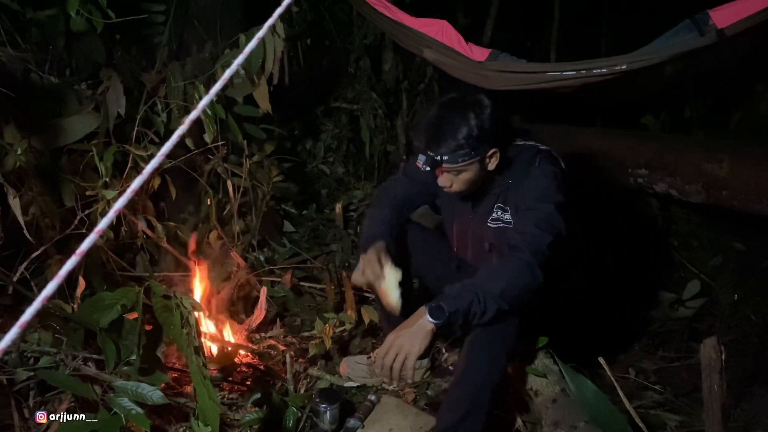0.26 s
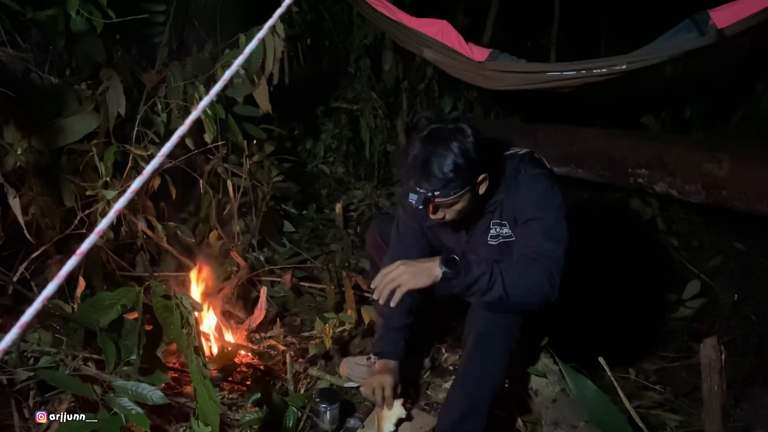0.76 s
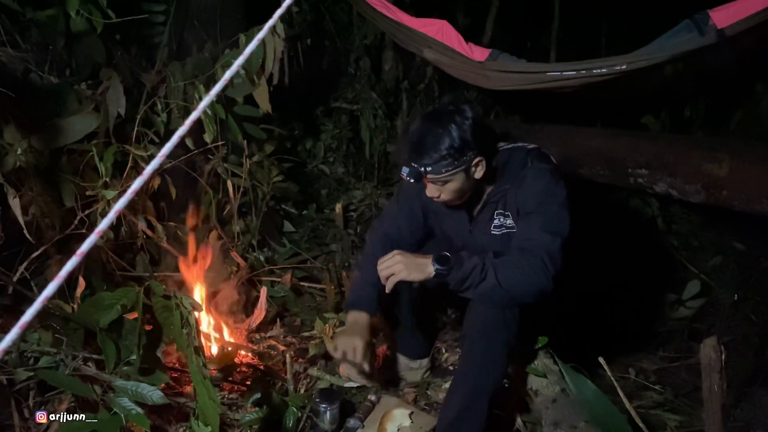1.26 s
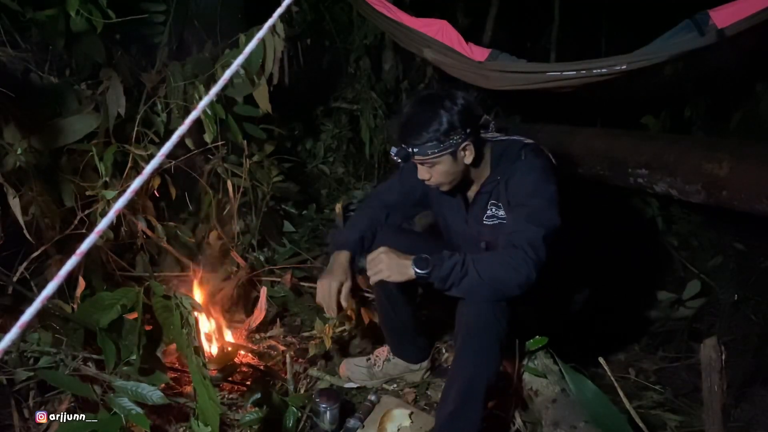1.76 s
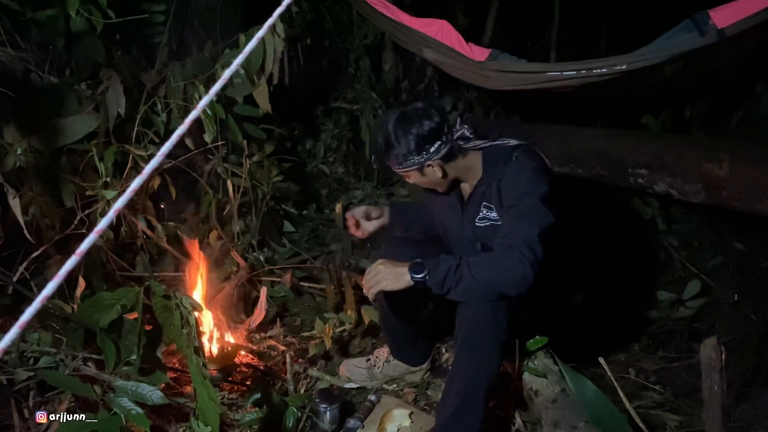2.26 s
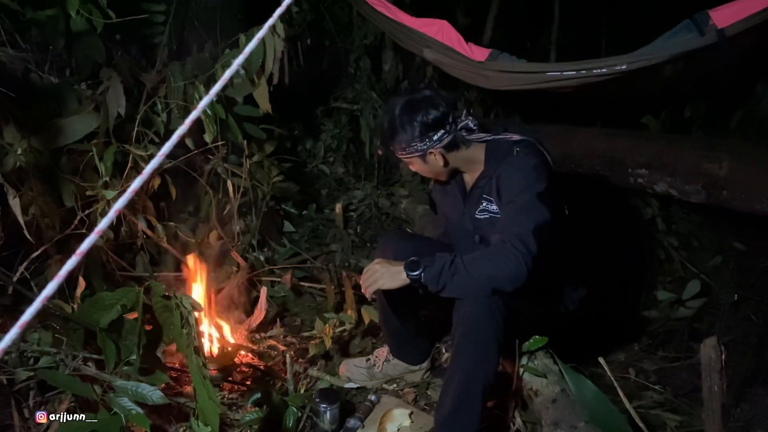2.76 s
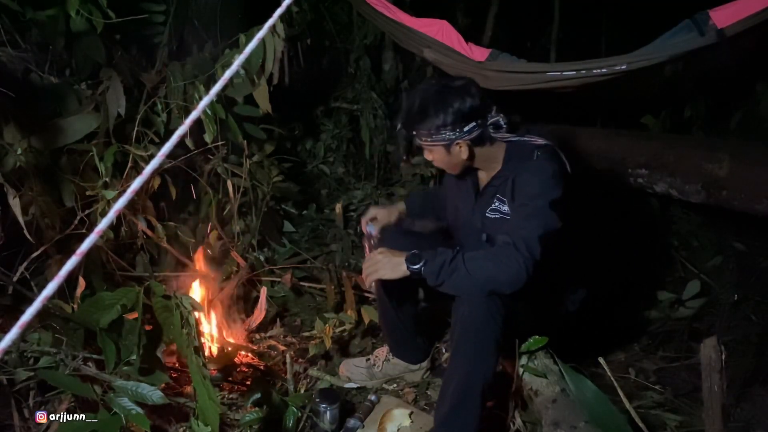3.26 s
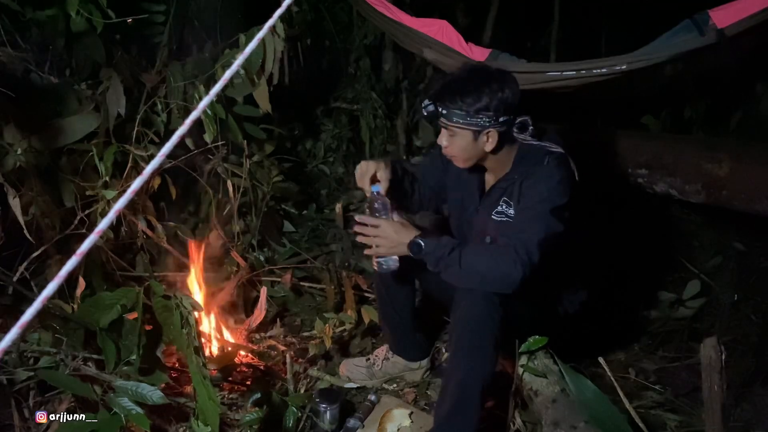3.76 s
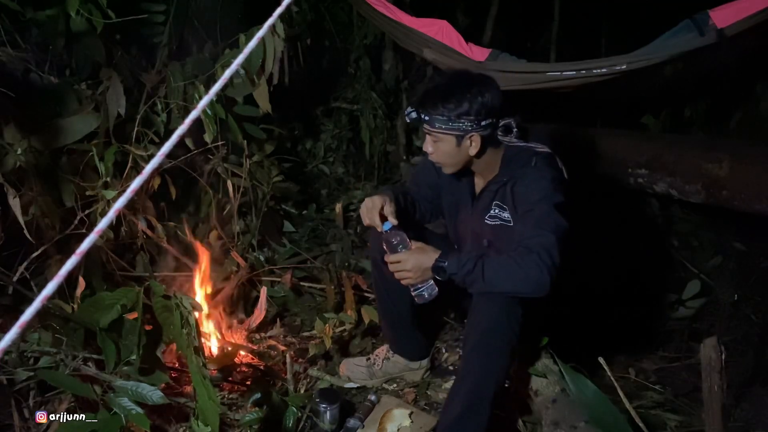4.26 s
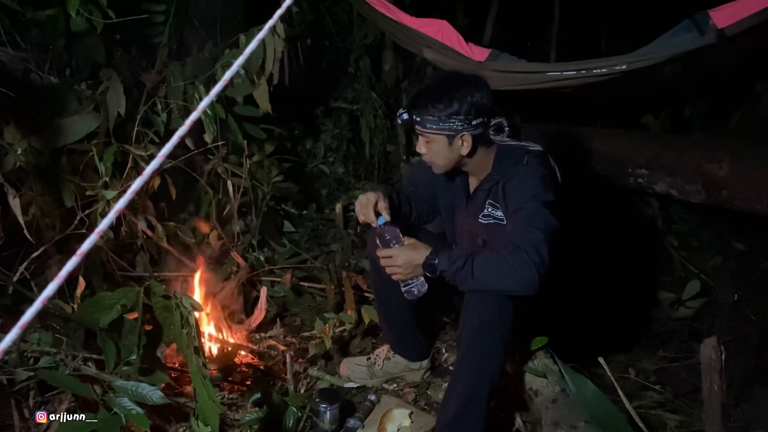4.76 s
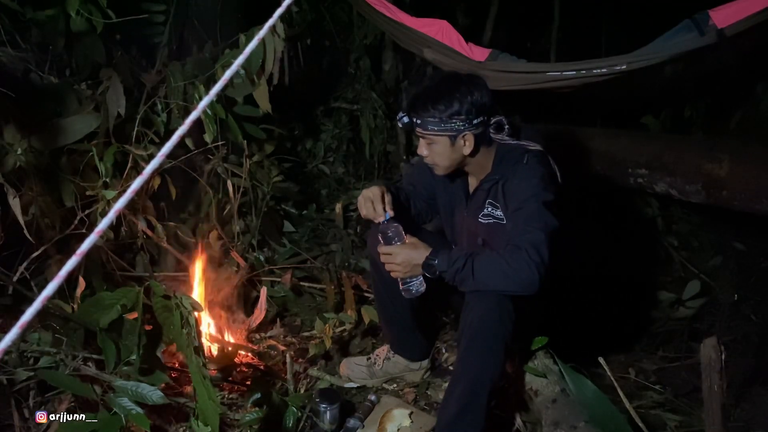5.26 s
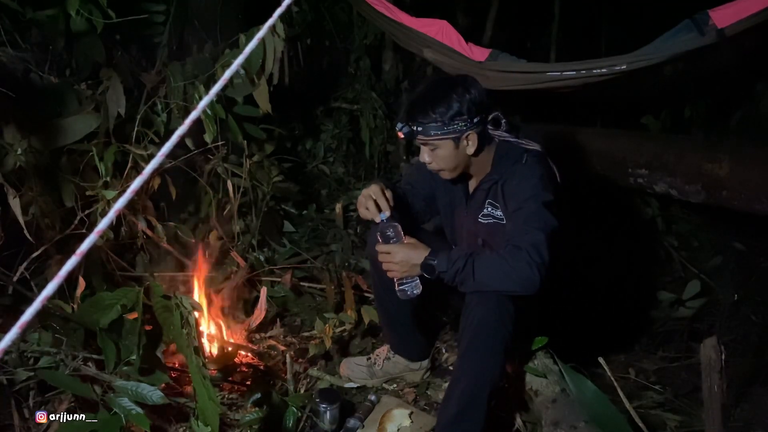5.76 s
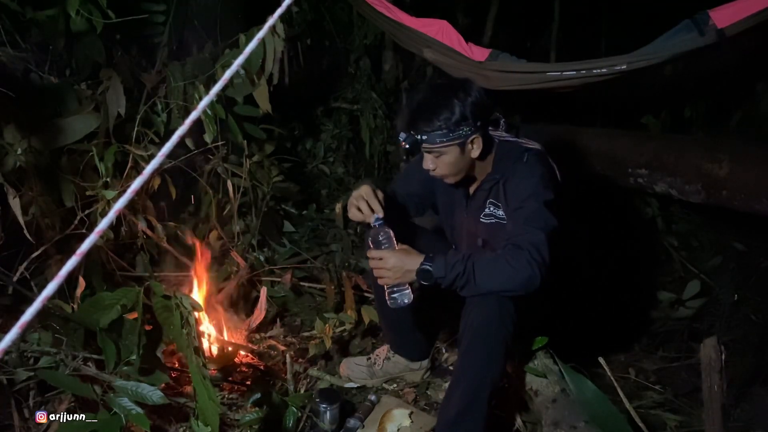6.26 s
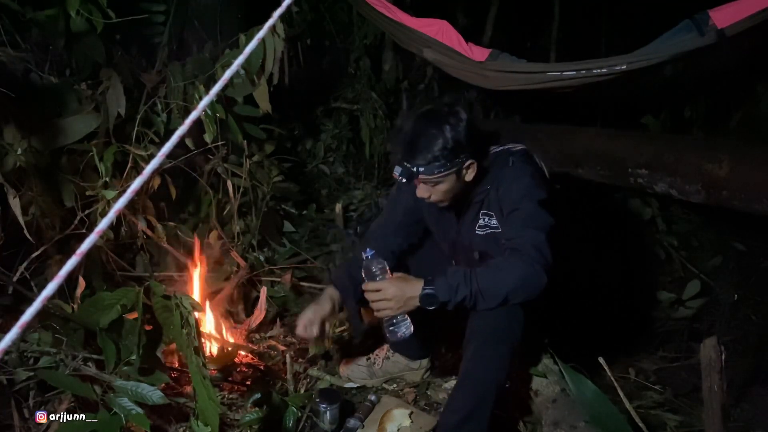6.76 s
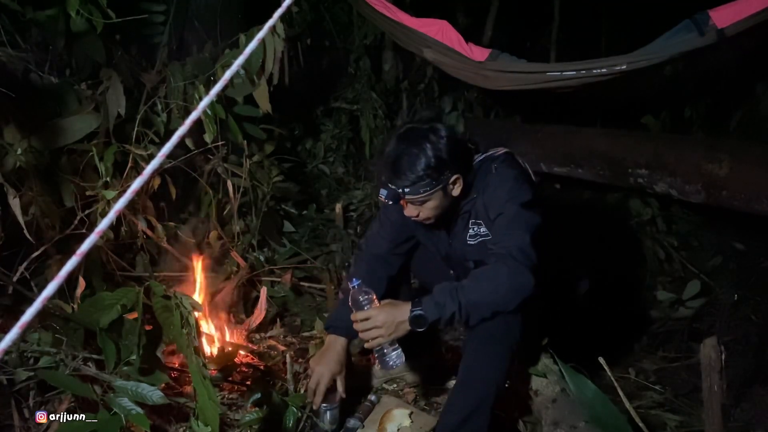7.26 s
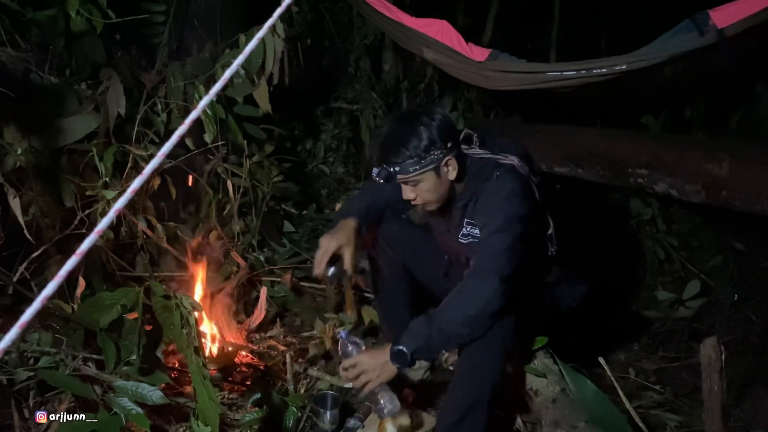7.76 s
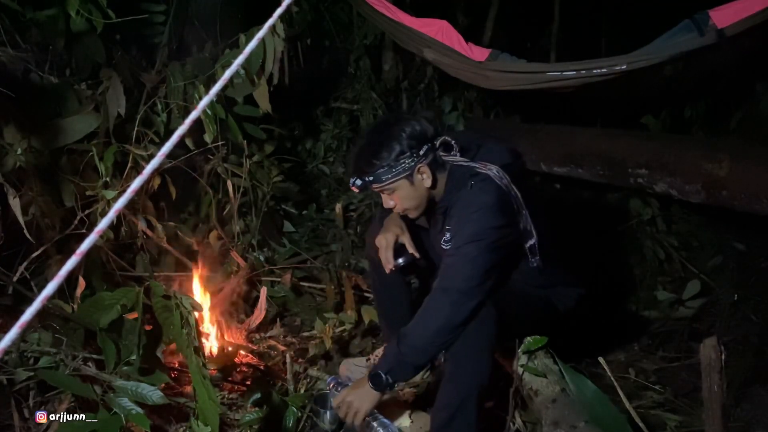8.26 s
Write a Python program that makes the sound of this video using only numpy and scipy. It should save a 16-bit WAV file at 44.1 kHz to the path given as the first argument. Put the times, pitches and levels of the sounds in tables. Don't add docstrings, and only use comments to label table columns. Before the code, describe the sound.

A tropical forest at night, heard in wide, airy stereo: continuous shrill cricket trilling, a fine treble hiss of katydids with regular ticks and random peeps. A small fire only flutters low underneath, with two sharp snaps in the first three seconds. Soft clothing movement and light taps come early, pause mid-way while a lower cricket pulses, then return around six to eight seconds, closing with a dull hollow bottle knock.

```python
import sys
import numpy as np
from scipy import signal
from scipy.fft import rfft, irfft, next_fast_len
from scipy.io import wavfile
from scipy.ndimage import uniform_filter1d

SR = 44100
rng = np.random.default_rng(int(sys.argv[2]) if len(sys.argv) > 2 else 0)


def to_wav(sig):
    pcm = np.clip(np.atleast_2d(sig), -1, 1) * 32767
    pcm = np.round(pcm).astype(np.int16)
    wavfile.write(sys.argv[1], SR, pcm.T)


def volts(x):
    e = np.asarray(x, float) / 20
    return 10 ** e


N = 375291

# [t/s, level/dB]
KATYDID_EFFORT = [(0.0, -61.5), (.9, -61), (2.5, -61), (5.0, -59.5), (6.5, -58), (7.1, -58), (7.5, -55.5),
                  (8.1, -57.5), (8.51, -59)]


def rms_one(x):
    return x / np.sqrt(np.mean(x ** 2) + 1e-20)


def in_time(rows):
    s, *columns = np.transpose(rows)
    return [np.interp(np.arange(N) / SR, s, c) for c in columns]


def at_hz(points, hz):
    points_hz, points_db = np.transpose(points)
    return np.interp(np.log(hz), np.log(points_hz), points_db, -80, -80)


def pan(db):
    return volts(np.array([[db / 2], [-db / 2]]))


def drift(rate_hz):
    r = np.exp(-80 * np.pi * rate_hz / SR)
    slow = signal.lfilter([1], [1, -2 * r, r * r], rng.standard_normal(N // 40 + 2002))[2000:]
    return np.interp(np.arange(N) / 40, np.arange(len(slow)), rms_one(slow))


def ring(s, db, hz, t60_s, rise_s=0.0015):
    out, at = np.zeros(N), round(s * SR)
    t = np.arange(min(N - at, SR // 4)) / SR
    envelope = volts(db - 60 * t / t60_s) * (1 - np.exp(-t / rise_s))
    out[at:at + len(t)] = envelope * np.sin(2 * np.pi * hz * t)
    return out


def coloured(white, spectrum):
    # [f/Hz, 0-1]
    likeness = [(30, 0.94), (120, 0.89), (300, 0.72), (600, 0.18), (1200, 0.48), (2500, 0.47), (5000, 0.37),
                (6800, 0.7), (9000, 0.9), (16000, 1)]
    size = next_fast_len(N)
    hz = np.arange(1, size // 2 + 2) * SR / size
    alike = np.clip(np.interp(hz, *np.transpose(likeness)), 0, 1)
    mid, side = rfft(white, size) * volts(at_hz(spectrum, hz))
    mid, side = irfft([np.sqrt(1 + alike) * mid, np.sqrt(1 - alike) * side], size)[:, :N]
    return (mid + side * [[1], [-1]]) / np.std(mid)


def grains(per_s, spread_db):
    sizes = volts(spread_db * np.minimum(rng.exponential(1, (2, N)), 5)) * rng.choice([-1, 1], (2, N))
    return sizes * (rng.random((2, N)) < per_s / SR)


def plateaus(rows, rise_db_s, fall_db_s, start_db=0, build_s=1):
    t = np.arange(0, N + 64, 64) / SR
    power = 0
    for start, end, db in rows:
        before, after = np.maximum(start - t, 0), np.maximum(t - end, 0)
        build_db = start_db * np.exp(-np.maximum(t - start, 0) / build_s)
        power = power + volts(2 * (db - rise_db_s * before - fall_db_s * after - build_db))
    return np.interp(np.arange(N) / SR, t, np.sqrt(power))


def riding(x, gain):
    slow = uniform_filter1d(x.mean(axis=0) ** 2, size=SR // 6)
    return x / np.sqrt(slow + slow.max() / 300) * gain


def fire_and_air():
    # [t/s, level over the steady fire/dB, width/s]
    flares = [(.5, 3, 0.23), (.96, 0, 0.025), (1.16, 6, 0.036), (1.37, 5, 0.026), (1.58, 4, 0.073),
              (2.3, 5, 0.03), (2.9, 1.5, 0.13), (3.43, 6.5, 0.017), (4.1, 4, 0.05), (4.6, 4, 0.048),
              (5.12, 3, 0.039), (6.26, 3.5, 0.067), (7.15, 0, 0.065), (7.31, 5, 0.062), (7.56, 4, 0.1)]
    # [f/Hz, density/dB]
    roar_spectrum = [(20, -12), (32, -16.5), (45, 0), (70, 2.5), (166, -4.5), (218, -8), (419, -8),
                     (634, -19), (900, -27.5)]
    # [f/Hz, density/dB]
    night_spectrum = [(300, -6.5), (600, -11), (1200, -16), (2050, -18), (2600, 0), (3200, -13),
                      (3750, -6.5), (4250, -2), (4900, -5), (5300, 4), (5620, 21.5), (5870, 4), (6150, -11)]
    start_db, end_db, night_db = -67.5, -70.5, -56.5
    t = np.arange(0, N + 64, 64) / SR
    lumps_db = sum(db * np.exp(-((t - s) / width_s) ** 2) for s, db, width_s in flares)
    fire_db = np.linspace(start_db, end_db, N) + np.interp(np.arange(N) / SR, t, lumps_db)
    flutter = rng.standard_normal((2, N)) * volts(2.65 * drift(10.9))
    roar = coloured(flutter, roar_spectrum) * volts(fire_db) * pan(1.7)
    return roar + volts(night_db) * coloured(rng.standard_normal((2, N)), night_spectrum) * pan(1.6)


def katydids():
    # [f/Hz, density/dB]
    chorus = [(6150, -8.5), (6500, -4.5), (7000, 1.5), (7800, 2.5), (8400, -1.5), (9000, -3.5),
              (9700, -6.5), (10500, -12), (11050, -8), (11280, -7), (11600, -15.5), (12300, -19),
              (14000, -20.5), (15750, -21.5)]
    # [t/s, peak/dB]
    ticks = [(1.2281, -52), (1.8794, -65), (2.3316, -49), (2.7761, -52), (3.2281, -50), (3.677, -49),
             (4.1165, -49), (4.2827, -51), (4.5535, -46), (4.9995, -51), (5.434, -49), (5.8844, -49),
             (6.3415, -49), (6.8853, -52), (7.208, -52), (7.643, -55)]
    # [t/s, peak/dB, f/Hz]
    chirps = [(0.1506, -50, 7490), (1.048, -74, 7480), (2.2987, -48, 7250), (2.8215, -54, 7520),
              (5.5847, -44, 7160), (5.8526, -56, 7340), (6.1958, -57, 7150), (6.3609, -54, 7050),
              (6.7436, -45, 7030), (6.9391, -59, 7400), (7.0529, -61, 7200), (7.2275, -47, 7040),
              (7.906, -44, 7330), (8.16, -54, 6940), (8.2526, -51, 7200), (8.4218, -57, 7300)]
    # [t/s, peak/dB, f/Hz]
    squeaks = [(0.2803, -67, 15100), (1.03, -63, 15500), (1.16, -62, 15400), (1.8761, -57, 15200),
               (2.0188, -64, 15600), (2.3037, -57, 15000), (2.8225, -64, 15300), (3.1243, -56, 15300),
               (3.937, -70, 14900), (7.8106, -62, 15200), (8.2676, -65, 14900)]
    tick_hz = 7990
    low_db, = in_time(KATYDID_EFFORT)
    top_db = -57.5 + 1.75 * (low_db + 60.5)
    white = rng.standard_normal((2, N)) + 0.37 * rms_one(grains(1500.0, spread_db=4.0))
    hiss = coloured(white, chorus)
    top = signal.sosfilt(signal.butter(2, 9300, "high", fs=SR, output="sos"), hiss)
    low = (hiss - top) * volts(low_db + 2.5 + 0.9 * drift(5.3))
    top = top * volts(top_db + 0.82 * drift(13.0))
    near = np.zeros(N)
    for s, db in ticks:
        near += ring(s, db + 6.5, tick_hz, 0.095, 0.0047) + ring(s + 0.0024, db - 5, 1.1 * tick_hz, 0.091)
    for s, db, hz in chirps:
        near += ring(s, db, hz, 0.048, 0.00082)
    for s, db, hz in squeaks:
        near += ring(s, db + 5, hz, 0.11, 0.0086)
        near += ring(s + 0.011, db, .985 * hz, 0.076, .008) + ring(s + .03, db, 1.012 * hz, 0.076, .008)
    return low + top + near


def peeps():
    per_s, t60_s, level_db = 5.9, 0.029, 5
    r, out = volts(-60 / (t60_s * SR)), 0
    for hz in (6660, 7040, 7200, 7330, 7770):
        starts = (rng.random(N) < per_s / SR) * volts(rng.normal(0, 3.3, N)) + 1e-18
        soft = uniform_filter1d(signal.lfilter([1], [1, -r], starts), size=200)
        out = out + soft * np.sin(2 * np.pi * hz / SR * np.arange(N))
    return out * volts(in_time(KATYDID_EFFORT)[0] + level_db)


def bottle_cap():
    start_s, length_s, low_hz, top_hz, db, uneven_db = 6.37, .165, 1050, 1850, -80, 4
    share = np.clip((np.arange(N) / SR - start_s) / length_s, 0, 1)
    hz = low_hz + (top_hz - low_hz) * (1 - np.abs(2 * share - 1))
    level = volts(db + uneven_db * drift(60.0)) * np.sqrt(np.sin(np.pi * share))
    return level * np.sin(2 * np.pi * np.cumsum(hz) / SR)


def creases():
    per_s, ring_cycles = 1500.0, 11
    clicks, dealt, out = grains(per_s, spread_db=3.0) + 1e-18, rng.integers(0, 12, N), 0
    for k, hz in enumerate(np.geomspace(900, 12000, num=12)):
        r = volts(-60 * hz / (ring_cycles * SR))
        poles = [1, -2 * r * np.cos(2 * np.pi * hz / SR), r * r]
        rung = signal.lfilter([(1 - r) / 2, 0, (r - 1) / 2], poles, clicks * (dealt == k))
        out = out + np.sqrt(hz) * rung / np.sqrt(1 - r)
    return rms_one(out)


def camper():
    # [start/s, length/s, level/dB]
    moves = [(0.128, 0.58, -75.5), (0.371, 0.088, -68.5), (0.54, 0.012, -67.5), (1.078, 0.077, -77.5),
             (1.152, 0.12, -69), (1.285, 0.33, -71), (1.438, 0.065, -67.5), (1.86, 0.045, -75.5),
             (1.9, 0.3, -83.5), (2.114, 0.011, -68.5), (2.234, 0.077, -70.5), (2.294, 0.14, -74),
             (2.66, 0.11, -87), (3.32, 0.078, -77), (3.393, .65, -82), (4.02, 0.063, -76),
             (4.16, 0.013, -86), (4.286, 0.02, -74.5), (6.084, 0.058, -75.5), (6.225, 0.025, -68.5),
             (6.284, 0.31, -79), (6.416, 0.072, -72.5), (6.62, 0.026, -73), (6.653, 0.41, -79.5),
             (7.445, .15, -79), (7.597, 0.13, -67.5), (7.578, 0.044, -78), (7.743, 0.29, -73.5),
             (8.338, 0.0076, -68.5)]
    # [f/Hz, density/dB]
    cloth = [(500, -14), (900, -9), (1500, -3.5), (2300, -1.5), (3500, -3), (6000, -11), (12000, -9.5),
             (16000, -8.5)]
    # [t/s, peak/dB, f/Hz]
    tap_rows = [(0.532, -64, 2200), (1.172, -60, 1600), (1.228, -54, 2040), (1.258, -52, 1640),
                (1.485, -54, 1750), (1.573, -59, 1950), (7.61, -59, 1800), (7.608, -57, 3200),
                (7.685, -54, 1710), (7.69, -60, 2500), (7.733, -61, 2500), (7.927, -65, 2900),
                (0.632, -54.5, 1710), (0.679, -55, 2200), (1.436, -56, 1310), (1.532, -52, 3160),
                (2.066, -62, 2500), (2.113, -58, 1310), (2.122, -44.5, 2215), (2.127, -59, 2930),
                (2.13, -60, 960), (2.119, -59, 4670), (2.236, -56, 2530), (3.36, -63, 1850),
                (4.284, -53.5, 2140), (4.287, -49, 2580), (4.413, -65, 2600), (6.1, -62, 422),
                (6.115, -56, 310), (6.195, -60, 330), (6.228, -55.5, 380), (6.247, -55, 470),
                (6.278, -62, 477), (6.285, -68, 895), (1.415, -67, 1330), (1.455, -62, 1300),
                (7.462, -59, 2420), (7.478, -59, 2550), (7.71, -67, 2500), (7.85, -64, 2520),
                (7.868, -61, 2450), (7.962, -63, 2450), (7.985, -56.5, 2540), (7.151, -53, 550),
                (7.256, -52, 435), (7.447, -61, 1610), (7.497, -59, 2570), (7.566, -57, 2370)]
    # [f/Hz, level/dB, t60/s]
    bottle = [
        (850, -5, .03),
        (897, -1, .095),
        (2950, -13, .08),
        (3030, -19, .25),
    ]
    still_db, uneven_db = -89, 1.2
    knock_s, knock_db, knock_side_db = 8.3795, -41.5, -1.5
    white = rng.standard_normal((2, N)) + 0.57 * creases()
    moving = plateaus([(s, s + length, db) for s, length, db in moves], rise_db_s=700, fall_db_s=340)
    rustle = coloured(white, cloth) * (moving + volts(still_db)) * volts(4.0 + uneven_db * drift(28.0))
    taps = np.zeros(N)
    for s, db, hz in tap_rows:
        taps += ring(s, db - 1.5, hz, 0.033, 0.00035) + ring(s, db - 7, 2 * hz, 0.0065, 0.00035)
    knock = sum(ring(knock_s, knock_db + db, hz, t60_s) for hz, db, t60_s in bottle)
    return rustle + taps + knock * pan(knock_side_db)


def embers():
    # [t/s, peak/dB, mid band/dB, low band/dB]
    snaps = [
        (2.2998, -43, -10, -20),
        (2.823, -43.5, 3, -26),
        (3.36, -63, 2, 3.5),
        (3.936, -54, -6, -15),
        (3.9637, -49, -9, -24),
        (4.285, -69, 4, 7),
        (6.228, -65.5, 7, 10.5),
        (6.247, -74, -1, 9),
        (6.633, -70, 2, 14.5),
        (8.33, -71, 2, 16),
    ]
    out, t = np.zeros((2, N)), np.arange(SR // 20) / SR
    for s, db, mid_db, low_db in snaps:
        for low_hz, high_hz, rel_db in ((8000, 13500, 0.004), (4300, 4700, mid_db - 21), (860, 2700, low_db)):
            noise = rng.standard_normal(len(t)) + 0.5 * rng.standard_normal((2, len(t)))
            band = signal.butter(2, [low_hz, high_hz], "band", fs=SR, output="sos")
            burst = signal.sosfilt(band, noise * volts(-60 * t / 0.027))
            out[:, round(s * SR):][:, :len(t)] += volts(db + rel_db + 4.0) * burst / np.abs(burst).max()
    return out


def cricket(calls, rate_hz, side_db, slide_s, pulse, second, rough, sway_db, echo_db, weak_start, count,
            bend=1, slowing=0, flips=0, release_s=.07, order=1, fade_db_s=81.0):
    overtone_db = -28.5
    out = np.zeros((2, N + SR))
    for start, end, first_hz, held_hz, level_db in calls:
        on = slice(max(round(start * SR), 0), min(round(end * SR), N))
        t = np.arange(on.start, on.stop) / SR - start
        lead_s = slowing * (1 - first_hz / held_hz) * slide_s * (1 - np.exp(-t / slide_s))
        beats = rate_hz * (t + lead_s)
        stroke = np.floor(beats)
        share = beats - stroke
        settling = np.exp(-(stroke / rate_hz / slide_s) ** bend)
        per_stroke = rng.standard_normal((2, 1500))[:, np.clip(stroke.astype(int), 0, 1499)]
        chance = per_stroke * rough * (1 + 4.9 * settling)

        gains = (1, second * (1 - settling) ** (5.4 * bend - 5.3))
        lags = (0, 1 - pulse)[::order]
        shape = sum(g * np.sin(np.pi * np.clip((share - lag) / pulse, 0, 1)) for g, lag in zip(gains, lags))

        hz = held_hz - (held_hz - first_hz) * settling
        turn = 2 * np.pi * hz * share / rate_hz + np.pi * flips * stroke
        turn = turn + chance[0] + 0.65 * drift(1.45)[on]
        tone = np.sin(turn) + volts(overtone_db) * np.sin(2 * turn)

        swell = (1 - weak_start * settling) * np.clip((end - start - t) / release_s, 0, 1)
        swell = swell * volts(sway_db * drift(2.27)[on] + 4.1 * chance[1])
        song = pan(side_db) * volts(level_db) * rms_one(swell * shape * tone)
        out[:, on] += [song[0], np.roll(song[1], count)]
        for k, lag in enumerate((rng.uniform(.002, .25, 32) * SR).astype(int)):
            out[k % 2, on.start + lag:][:len(t)] += volts(echo_db - fade_db_s * lag / SR) * song[k % 2]
    return out[:, :N]


def crickets():
    # [start/s, end/s, first f/Hz, held f/Hz, level/dB]
    high_calls = [
        [(-1.0, .72, 5200, 5690, -4), (.48, 1.6, 5150, 5385, -6), (.8, 3.3, 5150, 5615, -2),
         (1.5, 4.25, 5130, 5385, -14), (3.3, 5.5, 5550, 5640, -2), (5.53, 6.9, 5200, 5570, -6),
         (7.12, 9.0, 5150, 5615, -3)],
        [(-1.0, 1.3, 5200, 5610, -3), (1.3, 3.25, 5550, 5680, -3), (2.62, 4.3, 5350, 5570, -6),
         (3.53, 4.9, 5300, 5500, -9), (4.3, 6.95, 5600, 5690, -1), (6.8, 9.0, 5600, 5670, -4)],
        [(4.21, 6.7, 5230, 5600, -4), (6.29, 7.25, 5180, 5400, -8), (8.04, 9.0, 5250, 5540, -8)],
        [(1.8, 4.8, 5450, 5570, -8), (7.5, 9.0, 5450, 5560, -9)],
    ]
    middle_calls = [
        [(-1.0, .70, 4100, 4290, -65.5), (.83, 2.52, 4120, 4235, -60), (2.63, 4.29, 4120, 4235, -60),
         (4.42, 6.1, 4120, 4225, -61), (6.0, 7.25, 4250, 4250, -63), (7.15, 9.0, 4330, 4330, -67)],
        [(-1.0, .72, 4200, 4240, -72), (4.55, 5.8, 4120, 4230, -71), (5.7, 9.0, 4245, 4245, -67)],
    ]
    low_calls = [
        (-2.014, .211, 3395, 3640, -50.5),
        (4.25301, 6.377, 3395, 3640, -52.5),
    ]
    # [t/s, level/dB]
    trill = [(0.0, -41), (0.02, -54), (0.19, -52), (0.5, -54.5), (1.8, -48), (1.87, -50), (2.89, -50),
             (3.15, -44.5), (3.27, -57), (3.36, -50.5), (5.92, -52), (6.54, -49.5), (6.99, -57),
             (7.68, -50), (8.46, -51), (8.51, -43.5)]
    # [t/s, level/dB]
    low_effort = [(0.0, 0.5), (.3, -1), (4.25, -2), (4.55, 4), (5.2, 0), (6.1, -2), (6.35, -1), (8.51, 0.0)]
    # [lag/s, level/dB]
    trunks = [
        (.012, -13),
        (.035, -10),
        (.07, -19),
    ]
    high_rates_hz, high_sides_db = (46.84, 46.79, 46.89, 46.7), (0.5, 1, 3.5, 1)
    middle_rate_hz, middle_sides_db = 113.12, (4.5, 4.5)

    high = sum(cricket(calls, rate_hz, side_db, slide_s=0.095, pulse=0.57, second=0.51, rough=0.18,
                       sway_db=3.0, echo_db=2.5, weak_start=0.67, count=-1)
               for calls, rate_hz, side_db in zip(high_calls, high_rates_hz, high_sides_db))
    middle = sum(cricket(calls, middle_rate_hz, side_db, slide_s=0.5, pulse=0.66, second=0, rough=0.094,
                         sway_db=4.0, echo_db=-4.0, weak_start=0.21, count=0, slowing=.3, flips=k)
                 for k, (calls, side_db) in enumerate(zip(middle_calls, middle_sides_db)))
    low = cricket(low_calls, 30.965, 3, slide_s=0.41, pulse=0.52, second=1.18, rough=.06,
                  sway_db=0.0, echo_db=-17, weak_start=0.57, count=2,
                  bend=1.28, slowing=-.14, release_s=.006, order=-1, fade_db_s=98.0)
    near = sum(volts(db) * np.pad(low, ((0, 0), (round(lag * SR), 0)))[:, :N] for lag, db in trunks)

    holds = [(start, end, db) for calls in middle_calls for start, end, first_hz, held_hz, db in calls]
    middle_gain = plateaus(holds, rise_db_s=140, fall_db_s=70, start_db=14.0, build_s=.2)
    high = riding(high, volts(in_time(trill)[0]))
    return high + riding(middle, middle_gain) + volts(in_time(low_effort)[0]) * (low + near)


def scene():
    return fire_and_air() + katydids() + peeps() + bottle_cap() + camper() + embers() + crickets()


def thin_bands(pair):
    # [f/Hz, share]
    keep_share = [(500, .2), (1000, 0.39), (2200, .5), (2600, 0.27), (3200, 0.5), (3700, .06), (4600, .06),
                  (5000, 0.18), (6500, 0.052), (7500, 0.3), (9000, 0.53), (11000, 0.58), (13000, .66),
                  (16000, 0.33)]
    trill_mask_db, low_mask_db, grain_db = -29, -35, -2.5
    hz, _, lines = signal.stft(pair, SR, nperseg=2048)
    line_hz, centre_hz = hz[:1024, None], hz[4:1024:8, None]
    power = np.abs(lines[:, :1024]) ** 2
    bands = uniform_filter1d(power.reshape(2, 128, 8, -1).mean(axis=2), size=2, axis=2)
    total = bands.sum(axis=0)
    share = np.interp(centre_hz, *np.transpose(keep_share))
    usual = share ** 2 * np.median(total, axis=1, keepdims=True)
    masked = total.max(axis=0) * volts(2 * trill_mask_db) * (np.abs(centre_hz - 6100) < 300)
    low_call = total[19:22].max(axis=0)
    masked = masked + low_call * volts(2 * low_mask_db) * (np.abs(centre_hz - 3150) < 200)
    grainy = (line_hz > 6300) | (np.abs(line_hz - 2000) < 1300)
    coarse = np.repeat(bands, 8, axis=1) * volts(2 * grain_db) * grainy
    lines[:, :1024] *= np.repeat(bands > np.maximum(usual, masked), 8, axis=1) * (power > coarse)
    return signal.istft(lines, SR, nperseg=2048)[1][:, :N]


def roll_off(x):
    return signal.sosfilt(signal.butter(12, 16360, fs=SR, output="sos"), x)


def record(dry):
    port_from_hz, port_turn_hz, cut_hz = 6950, 4100, 15770
    size = next_fast_len(N + SR // 10)
    hz = np.arange(size // 2 + 1) * SR / size
    turn = np.pi * np.maximum(hz - port_from_hz, 0) / port_turn_hz
    ports = np.exp(1j * turn * [[-1], [1]])
    left, right = irfft(rfft(dry, size) * (hz < cut_hz) * ports, size)[:, :N]
    mid, side = thin_bands(np.array([left + right, left - right]) / 2)
    return roll_off(np.array([mid + side, mid - side]))


dry = scene()
out = record(dry)
to_wav(out)
```